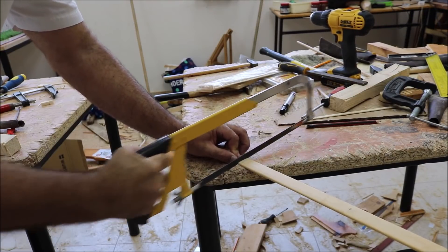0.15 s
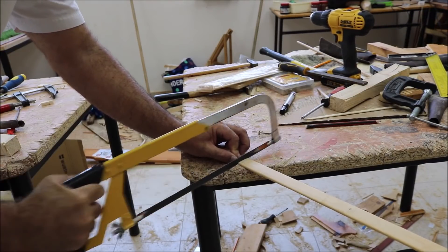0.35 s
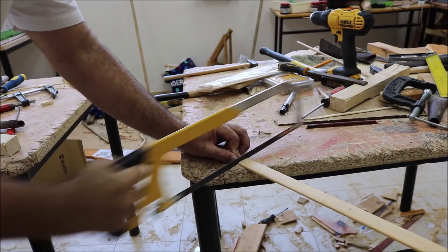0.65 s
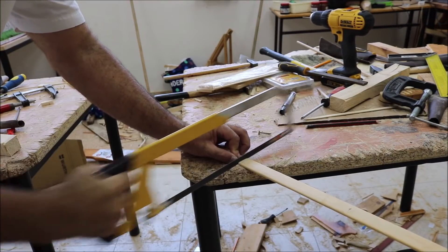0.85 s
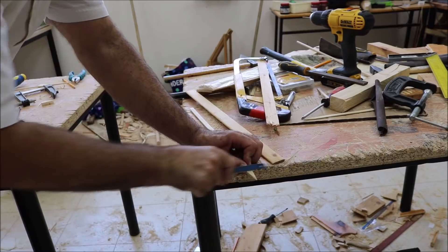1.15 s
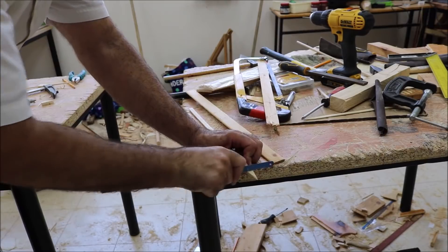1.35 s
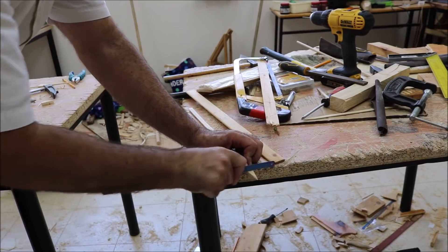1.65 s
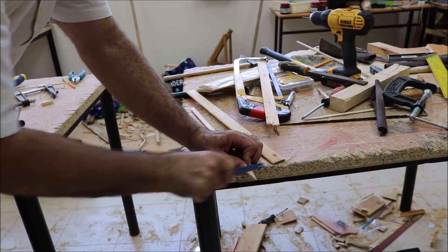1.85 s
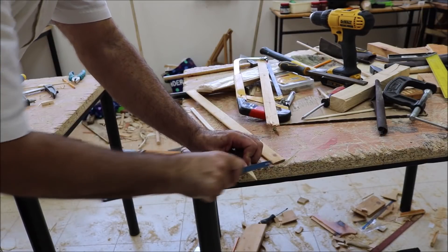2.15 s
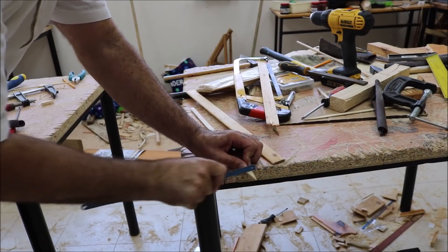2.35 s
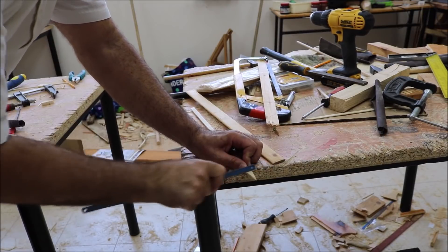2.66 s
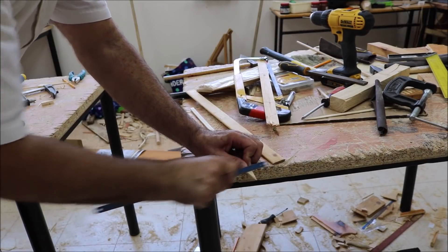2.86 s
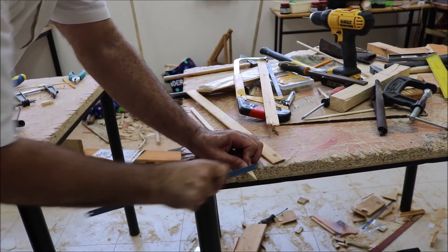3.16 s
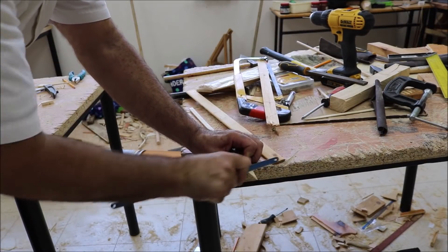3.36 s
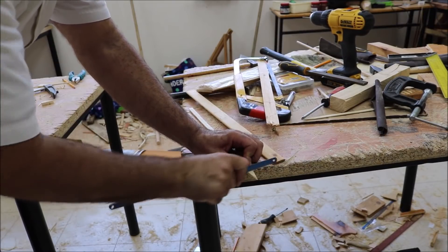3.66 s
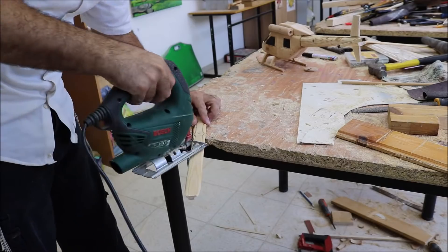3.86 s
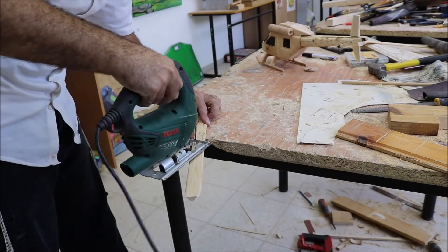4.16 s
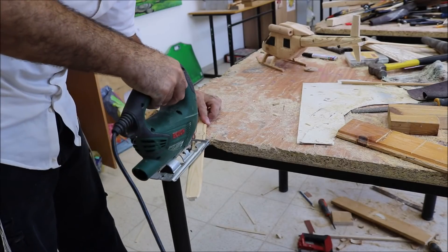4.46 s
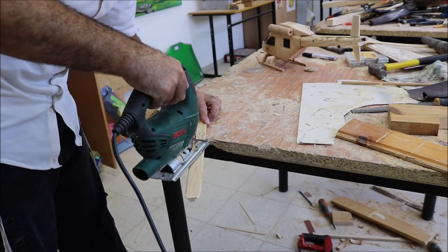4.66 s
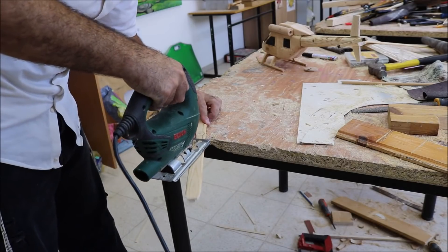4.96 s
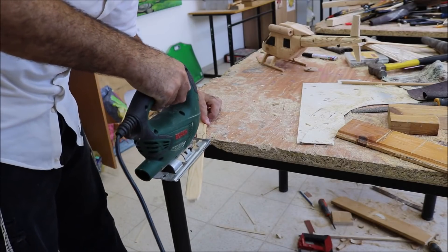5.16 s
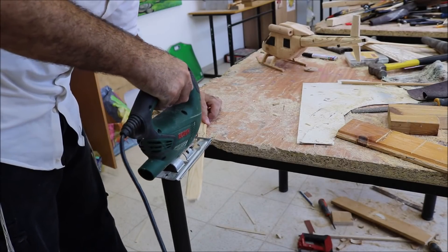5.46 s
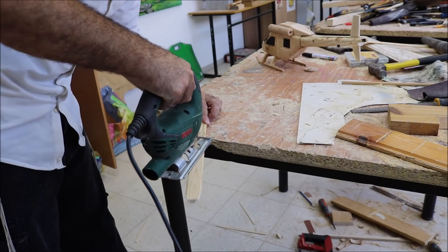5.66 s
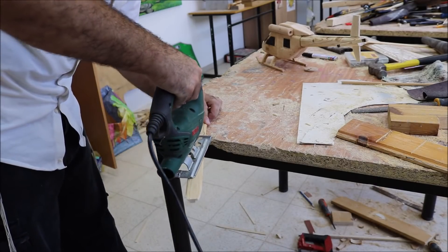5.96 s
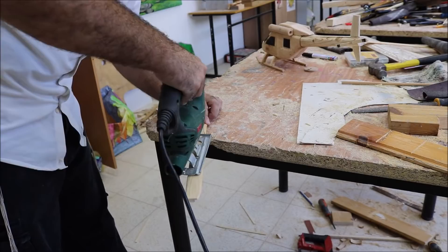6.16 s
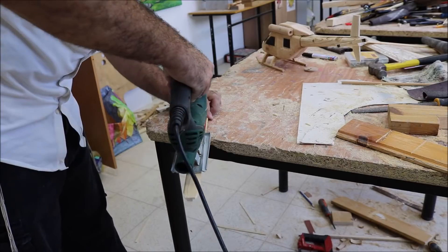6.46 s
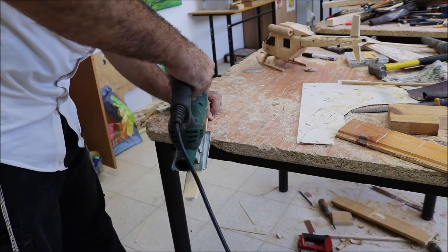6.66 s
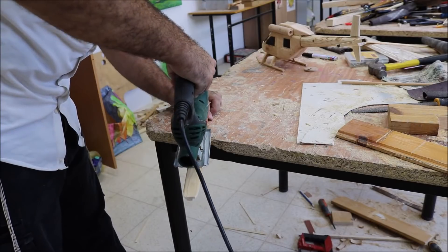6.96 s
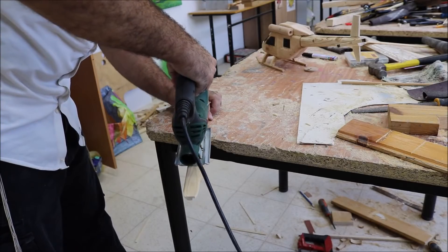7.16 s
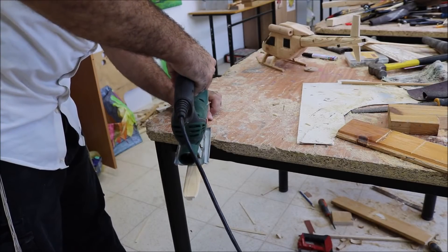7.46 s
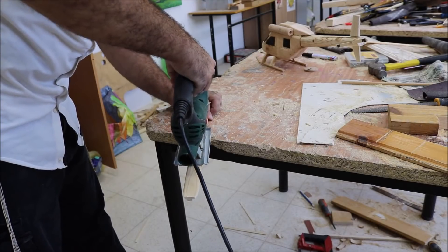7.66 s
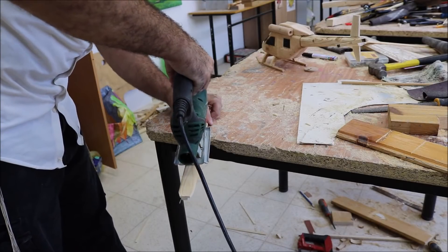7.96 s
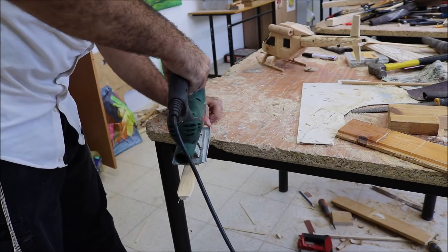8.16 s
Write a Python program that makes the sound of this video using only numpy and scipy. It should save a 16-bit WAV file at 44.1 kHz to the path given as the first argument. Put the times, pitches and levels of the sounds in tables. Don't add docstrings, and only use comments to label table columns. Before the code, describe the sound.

From 0 to 1 s a hacksaw rasps a thin slat in roughly quarter-second strokes, its teeth making a hollow woody buzz over low room rumble. After a tiny gap, at 1.05 s, a bare blade scrubs a small stick about seven strokes a second, drier and more ringing, growing brighter; sharp ticks hit the bench edge, with small squeaks around 1.7, 2.3 and 2.6 s and the loudest at 3.6 s. At 3.8 s the sound switches to a close electric jigsaw: a short blip just before 4 s, a longer pulse at 4.4 s, then a steady run from 4.7 s with whine, gear clatter and airy hiss. It labours near 5.9 s, drops out at 6.4 s amid light wooden knocks, restarts at 6.5 s with denser buzzing, and is released at 7.6 s, coasting down with a faint falling whistle and lingering hiss to about 8.4 s.

```python
import sys
import numpy as np
from scipy import signal
from scipy.fft import rfft, irfft, next_fast_len
from scipy.io import wavfile
from scipy.ndimage import uniform_filter1d, map_coordinates

SR = 44100
rng = np.random.default_rng(int(sys.argv[2]) if len(sys.argv) > 2 else 0)


def master(y):
    cut = np.clip(np.atleast_2d(y).T, -1, 1)
    pcm = np.round(cut * 32767)
    wavfile.write(sys.argv[1], SR, pcm.astype(np.int16))


def linear_from_db(decibels):
    return 10 ** (np.asarray(decibels, float) / 20)


N = 366471

T = np.arange(N) / SR
SIZE = next_fast_len(N + SR // 2)
LOG_HZ = np.log(np.arange(SIZE // 2 + 1) * SR / SIZE + 1)
GAP_S, BLADE_S, CUT_S, TRIGGER_S = 1.017, 1.049, 3.79, 3.964
FULL_HZ, START_HZ, COAST_HZ = 209.6, 135, 80
MESH_RATIO = 28 / 3

# f/Hz, level/dB per Hz
ROOM_COLOUR = [
    [(24, -43), (40, -14), (301, -9.5), (377, -4), (420, -14), (520, -6), (680, -13), (1140, -120)],
    [(18, -45), (34, -9), (50, -3), (96, -7), (124, 1.5), (167, 0.5), (268, -0.5), (329, -6), (392, -4),
     (549, -6.5), (760, -4.5), (990, -5), (1670, -120)],
    [(24, -73), (40, -39), (243, -12), (290, -9), (455, -11.5), (600, -3), (697, -10.5), (790, -2.5),
     (1550, -17), (1680, -20), (2210, -17), (2570, -21.5), (16000, -39.5)],
]
# t/s, width/s, gain/dB
SWELLS = [
    (.6, 0.047, 8),
    (1.21, 0.047, 8.5),
    (1.64, 0.14, 4.5),
]
# f/Hz, left minus right/dB
LEAN = [
    [(100, 1.5), (700, 1.5), (1300, 1), (2400, -3.5), (15000, 0)],
    [(700, 0.8), (4400, 1.2), (8100, -2)],
]
# f/Hz, likeness/0-1
FAR = [(60, 0.97), (200, 0.95), (640, 0.67), (1400, 0.26), (3000, 0.2), (15000, 0.16)]
# f/Hz, likeness/0-1
NEAR = [(300, 1), (640, 0.99), (1400, 0.99), (3100, 0.82), (6800, 0.36), (15000, 0.49)]
# start t/s, level/dB, fastest tooth rate f/Hz, place of fastest moment/0-1
SAW_STROKES = [
    (-.1, -25.5, 790, 0.39),
    (.125, -26.5, 810, .3),
    (.375, -27, 855, .7),
    (.595, -26, 835, .3),
    (.82, -27, 850, .65),
]
# f/Hz, width/Hz, level/dB
SLAT_MODES = [(600, 110, -2.5), (800, 280, 1.5), (1550, 400, 0.5), (2130, 160, -0.5), (2290, 470, -6.5),
              (3400, 970, -15)]
# f/Hz, level/dB per Hz
HACKSAW_COLOUR = [(590, -43), (1000, -17), (1160, -31), (1550, -3.5), (1870, -6.5), (2470, -6), (2740, -13),
                  (8450, -25), (16000, -41.5)]
# start t/s, level/dB, brightness/dB
BLADE_STROKES = [(.97, -36.5, -10), (1.14, -35, -10.5), (1.28, -35, -13), (1.42, -31, -12.5),
                 (1.58, -34, -12.5), (1.699, -31, -10), (1.859, -31.5, -13.5), (1.98, -31, -11.5),
                 (2.13, -34, -9), (2.25, -31, -12.5), (2.4, -33.5, -8), (2.541, -29, -12.5),
                 (2.7, -35, -7.5), (2.821, -33, -9), (2.96, -35, -6.5), (3.12, -31, -9.5), (3.27, -33, -10),
                 (3.409, -32.5, -8), (3.55, -32, -12), (3.69, -32.5, -8)]
# f/Hz, width/Hz, level/dB
STICK_MODES = [(1032, 64, -3), (1295, 54, 3), (1544, 52, 0), (1732, 25, 4.5), (1970, 55, -2.5),
               (2370, 44, 1), (2640, 77, -10), (3000, 300, -10)]
# f/Hz, level/dB per Hz
BLADE_COLOUR = [(470, -58), (800, -6.5), (1070, -1.5), (1150, -9), (1260, 1.5), (1420, -2.5), (1550, -0.5),
                (1900, -6), (2410, -2.5), (3600, -22), (8880, -21.5), (11300, -29), (16000, -38)]
# t/s, peak level/dB, f/Hz
TICKS = [(1.1438, -37, 14500), (1.4466, -39, 14600), (1.7235, -37, 15600), (2.0058, -40, 13200),
         (2.1176, -36, 10200), (2.2832, -34, 15600), (2.3984, -35, 10200), (2.5661, -33, 13200),
         (2.6713, -38, 10100), (2.8559, -33, 10000), (2.9684, -35, 14000), (3.1188, -31, 13200),
         (3.2555, -37, 10100), (3.4336, -29, 15300), (3.5433, -33, 10100), (3.7189, -31, 15500),
         (3.8761, -44, 10200)]
# t/s, peak level/dB, f/Hz
SQUEAKS = [
    (1.735, -31.5, 846),
    (1.76, -30.5, 705),
    (2.31, -35, 1287),
    (2.6, -27, 2370),
    (3.6, -25.5, 1558),
    (3.625, -22, 1518),
]
# t/s, peak level/dB, f/Hz
KNOCKS = [
    (6.244, -44, 431),
    (6.262, -42, 257),
    (6.329, -45, 423),
    (6.344, -42, 520),
    (6.376, -39.5, 415),
    (6.409, -56, 288),
    (6.468, -49, 209),
]
# t/s, length/s, first f/Hz, growth/per s, level/dB
WHISTLES = [
    (3.968, .027, 5600, 36, -34),
    (4.1, .3, 12500, -2.23, -38),
    (7.92, .3, 10450, -2.42, -38.5),
]
# on t/s, off t/s
BLIPS_S = [
    (3.966, 4.0),
    (4.4, 4.72),
]
# on t/s, off t/s
POWER_S = [
    (4.72, 6.375),
    (6.51, 7.597),
]
# t/s, gain/dB, decay/s
JOLTS = [
    (3.963, 6.5, 0.027),
    (4.404, 8.5, 0.033),
    (4.5, 3, 0.031),
    (4.646, 4.5, 0.047),
]
# t/s, width/s, speed loss/Hz, mesh gain/dB
PUSHES = [
    (5.901, .14, 4.13, 8.5),
    (6.5, .025, .1, 8),
    (6.61, 0.024, 0.52, 12),
    (6.75, .08, 2, 8),
]
# t/s, pressure/0-1
PRESSURE = [(5.0, 0.07), (5.48, 0.42), (5.7, 0.33), (5.88, 0.91), (6.08, .7), (6.38, 0.72), (6.6, 0.87),
            (6.8, 1), (7.17, 0.73)]
# t/s, level/dB
RUSH = [(3.97, -30), (4.15, -30.5), (4.39, -34.5), (4.45, -33), (4.72, -31.5), (4.8, -29.7), (5, -30),
        (6, -32), (6.2, -30), (6.46, -32.5), (6.6, -29.7), (7.5, -31), (8.05, -32.5), (8.24, -34),
        (8.29, -33.5)]
# f/Hz, level/dB per Hz
RUSH_COLOUR = [(530, -40), (900, -27), (1340, -18), (1460, -18.5), (1550, -14.5), (1920, -13), (2140, -13),
               (4010, -7.5), (6970, -3.5), (13200, -1), (16000, -6.5)]
# f/Hz, width/Hz, level/dB
CASING_MODES = [(13200, 1100, -1.5), (7800, 1200, -13)]
# multiple of half turn, first run level/dB, second run level/dB
FIELD = [(1.93, -78.5, -83.5), (4.02, -68.5, -70), (5.03, -70.5, -66.5), (5.98, -72.5, -60),
         (7.044, -61, -59), (8.03, -50.5, -57), (10.03, -63, -62), (11.05, -56, -54), (11.93, -59, -56),
         (13.1, -59, -55), (13.9, -56.5, -58), (19.94, -73, -49.5), (32.4, -65, -51), (35.8, -66, -53)]
# multiple of half turn, first run level/dB, second run level/dB
BARS = [(48, -52, -54), (50, -52, -54), (52, -49, -53), (56, -53, -43.5), (58, -47, -43.5), (60, -51, -53),
        (62, -52, -51), (64, -53, -55)]
# multiple of mesh rate, level/dB
GEAR = [(1, 1), (2, -8.5), (4, -6), (7, -9)]


def curves(table):
    s, *columns = np.transpose(table)
    return [np.interp(T, s, c) for c in columns]


def along(points):
    hz, value = np.transpose(points)
    return np.interp(LOG_HZ, np.log(hz), value)


def colour(x, points, split_hz):
    low = 1 / (1 + np.exp(6 * (LOG_HZ - np.log(split_hz))))
    shaped = rfft(x, SIZE) * linear_from_db(along(points))
    return irfft(shaped * np.array([low, 1 - low]), SIZE)[:, :N]


def unit(x, lo_hz, hi_hz):
    band = abs(rfft(x, SIZE)[int(lo_hz * SIZE / SR):int(hi_hz * SIZE / SR)]) ** 2
    return x / np.sqrt(2 * band.sum() / SIZE / N)


def ring(x, modes):
    out = 0
    for k, (hz, width_hz, db) in enumerate(modes):
        b, a = signal.iirpeak(hz, hz / max(width_hz, 5), SR)
        out = out + (-1) ** k * linear_from_db(db) * signal.lfilter(b, a, x)
    return out


def walk(rate_hz, size=N):
    levels = np.repeat(rng.standard_normal(int(9 * rate_hz) + 9), 4)
    levels = uniform_filter1d(levels, 4)
    return 1.2 * np.interp(T[:size] * rate_hz * 4, np.arange(len(levels)), levels)


def gate(t0_s, t1_s, fade_s=0.00064):
    return np.clip(np.minimum(T - t0_s, t1_s - T) / fade_s, 0, 1)


def bumps(s, width_s, size):
    return sum(g * np.exp(-((T - t) / w) ** 2) for t, w, g in zip(s, width_s, size))


def strokes(starts_s, end_s, at):
    edges = np.append(starts_s, end_s)
    place = np.interp(T, edges, np.arange(len(edges)) - 1e-9)
    k = np.clip(np.floor(place).astype(int), 0, len(starts_s) - 1)
    part = place - k
    at = np.clip(np.broadcast_to(at, len(starts_s))[k], .05, .95)
    return k, np.clip(np.minimum(part / at, (1 - part) / (1 - at)), 0, 1)


def teeth(hz, jitter, wander, scatter_db):
    uneven_hz = hz * (1 + jitter * walk(400) + wander * walk(50))
    bites = np.diff(np.floor(np.cumsum(uneven_hz) / SR), prepend=0)
    return bites * linear_from_db(scatter_db * rng.standard_normal(N))


def grit(spread_db):
    return rng.standard_normal(N) * linear_from_db(spread_db * walk(900))


def hits(table, decay_s, noisy):
    out, t = np.zeros(N + 4096), T[:4096]
    for s, db, hz in table:
        noise = np.interp(t / decay_s * 45, np.arange(256), rng.standard_normal(256))
        rough = 1 - noisy + noisy * noise
        envelope = np.exp(-t / decay_s) * np.minimum(t * hz, 1)
        out[int(s * SR):][:4096] += linear_from_db(db) * rough * np.sin(2 * np.pi * hz * t) * envelope
    return out[:N]


def space(x, likeness, lean, t60_s, wet_db):
    t = T[:SR // 2]
    decay = np.exp(-np.log(1000) * t / (t60_s * np.array([[1], [1.6]])))
    tails = rng.standard_normal((2, len(t))) * decay
    mid, side = rfft(tails / np.linalg.norm(tails, axis=1, keepdims=True), SIZE)
    like = np.clip(along(likeness), 0, .995)
    mid = (1 + linear_from_db(wet_db) * mid) / np.sqrt(1 + linear_from_db(2 * wet_db))
    side = side * np.sqrt((1 - like) / (1 + like))
    tilt = linear_from_db(along(lean) / 2)
    return irfft(rfft(x, SIZE) * np.array([(mid + side) * tilt, (mid - side) / tilt]), SIZE)[:, :N]


def room(shot):
    level_db = (-55.5, -48, -55.5)[shot] + bumps(*np.transpose(SWELLS))
    ducked_db, recover_db_s, duck_s = -77.5, 27, 0.03
    on = sum(gate(*p) for p in [*BLIPS_S, *POWER_S]) > 0
    idle_s = T - np.maximum.accumulate(np.where(on, T, -9))
    level_db = np.minimum(level_db, ducked_db + recover_db_s * idle_s)
    level_db = uniform_filter1d(level_db, int(duck_s * SR))
    rumble = sum(colour(rng.standard_normal(N), ROOM_COLOUR[shot], 300))
    return linear_from_db(level_db) * unit(rumble, 105, 380)


def hacksaw():
    starts_s, level_db, top_hz, fastest = np.transpose(SAW_STROKES)
    end_s, turn_hz = 1.03, 700
    k, effort = strokes(starts_s, end_s, at=.31)
    slack = 1 - effort
    level_db = uniform_filter1d(level_db[k], 999)
    slat_db = level_db - 0.5 - 6.5 * slack ** 2
    rasp_db = level_db - 10.5 * slack
    treble_slack = 1 - strokes(starts_s - 0.022, end_s, at=0.41)[1]
    treble_db = level_db - 9.5 - 17 * treble_slack ** 1.58

    speed = strokes(starts_s, end_s, fastest)[1]
    bites = teeth(turn_hz + (top_hz[k] - turn_hz) * speed, jitter=.078, wander=.045, scatter_db=3.5)
    slat, rasp = colour(ring(bites + 0.043 * grit(1.8), SLAT_MODES), [(500, 2.5), (1100, -8)], 1250)
    scrape, treble = colour(grit(1.3), HACKSAW_COLOUR, 3750)
    rasp = unit(rasp, 1200, 3400) + linear_from_db(-6.0) * unit(scrape, 1200, 3000)
    slat = linear_from_db(slat_db - 1.5 + 3.2 * walk(70)) * unit(slat, 550, 1000)
    rasp = linear_from_db(rasp_db - 1.0 + 2.03 * walk(45.7)) * rasp
    return slat + rasp + linear_from_db(treble_db) * unit(treble, 3700, 12000)


def blade():
    starts_s, level_db, bright_db = np.transpose(BLADE_STROKES)
    sounding_s, end_s = starts_s + 0.0076, 3.85
    k, effort = strokes(sounding_s, end_s, at=0.38)
    rasp_gain = effort * linear_from_db(level_db)[k] + (1 - effort) * linear_from_db(-43)
    bright = strokes(sounding_s, end_s, np.resize((0.35, 0.34), len(starts_s)))[1]
    bright = np.minimum(1.24 * bright, 1) ** 1.65
    turn_db = np.resize((-57, -62), len(starts_s)) + 3.4 * (starts_s - BLADE_S)
    turn_gain = np.interp(T, starts_s, linear_from_db(turn_db))
    treble_gain = bright * linear_from_db(level_db + bright_db - 1.5)[k] + (1 - bright) * turn_gain

    scrape, treble = colour(grit(1.6), BLADE_COLOUR, 2370)
    rasp = unit(ring(grit(1.6), STICK_MODES), 800, 3200) + linear_from_db(-1.0) * unit(scrape, 740, 3200)
    rasp = rasp_gain * linear_from_db(-3.5 + 1.07 * walk(40)) * rasp
    return rasp + treble_gain * linear_from_db(-0.7) * unit(treble, 5300, 9600)


def whistles():
    out = 0
    for s, length_s, first_hz, growth, db in WHISTLES:
        hz = first_hz * np.exp(growth * np.clip(T - s, 0, length_s))
        tone = np.sin(2 * np.pi * np.cumsum(hz * (1 + .011 * walk(300))) / SR)
        fall_db = 5 * np.log10(hz / first_hz) * (growth < 0)
        envelope = gate(s, s + length_s, fade_s=length_s / 6) ** .7
        out = out + linear_from_db(db + 2 * walk(80) + fall_db) * tone * envelope
    return out


def motor_speed():
    run_up_s, coast_s = .068, .185
    hz, now_hz = np.full(N, 1. * START_HZ), START_HZ
    moments = np.append(np.ravel(POWER_S), 9)
    goals = [(FULL_HZ, run_up_s), (COAST_HZ, coast_s)] * 2
    for a, b, (goal_hz, tau_s) in zip(moments, moments[1:], goals):
        glide = goal_hz + (now_hz - goal_hz) * np.exp(-np.maximum(T - a, 0) / tau_s)
        hz = np.where(T >= a, glide, hz)
        now_hz = goal_hz + (now_hz - goal_hz) * np.exp(-(b - a) / tau_s)
    return hz - bumps(*np.transpose(PUSHES)[:3])


def rush(turn):
    rise_s, jolts_db = 0.0055, 0
    for s, db, decay_s in JOLTS:
        fall = np.exp(-np.maximum(T - s - rise_s, 0) / decay_s)
        jolts_db = jolts_db + db * np.clip((T - s) / rise_s, 0, 1) * fall
    rush_db = curves(RUSH)[0] + jolts_db
    edge_db = rush_db - 12 + 4 * curves(PRESSURE)[0]

    share = .42 * sum(gate(*p, fade_s=0.098) for p in POWER_S)
    pattern = rng.standard_normal((64, 630))
    place = [T * 6, turn / (6 * np.pi) % 1 * 630]
    clatter = map_coordinates(pattern, place, order=1, mode="grid-wrap")
    throb = 1 + 0.12 * np.sin(turn) + 0.055 * np.sin(turn * 4 / 3) + .08 * np.sin(2 * turn)
    hiss = np.sqrt(1 - share) * grit(0.97) * throb + 1.28 * np.sqrt(share) * clatter
    edge, top = colour(hiss, RUSH_COLOUR, 5600)

    top = top + linear_from_db(-5) * ring(top, CASING_MODES) * gate(0, POWER_S[0][0] + .1, fade_s=.1)
    top = linear_from_db(rush_db + 0.62 * walk(30)) * unit(top, 4500, 15200)
    edge = edge - 1.24 * share * colour(edge, [(900, 0), (2000, 0)], 2030)[0]
    edge = linear_from_db(edge_db - 1.8 * share + 0.66 * walk(20)) * unit(edge, 1500, 4970)
    return (top + edge) * gate(TRIGGER_S, 9)


def drive(hz, turn):
    start = int(CUT_S * SR)
    run = (T > POWER_S[1][0]).astype(int)
    since_s = T - np.array(POWER_S)[run, 0]
    slow_db = 20 * np.log10(hz / FULL_HZ)
    on = sum(gate(*p, fade_s=.03) for p in POWER_S)
    s, width_s, _, push_db = np.transpose(PUSHES)

    hum_free_db, hum_pressed_db = -83, -51
    hum_db = hum_free_db + (hum_pressed_db - hum_free_db) * curves(PRESSURE)[0]
    hum_db = hum_db + 9 * slow_db * (1 - on / 2) - 12 * (1 - on)
    # level at start, fall in dB/s
    mesh_db = np.array((-44.5, -54))[run] - np.array((6.5, 1))[run] * since_s
    mesh_db = np.maximum(mesh_db + bumps(s, width_s, push_db) - 3.4 * (1 - on), -58)
    mesh_db = np.where(T > POWER_S[1][1], -50.5 + 1.9 * slow_db, mesh_db)
    whine_db = np.array((-40, -45))[run] - np.array((.5, 12))[run] * since_s
    whine_db = whine_db + 1.5 * walk(4.4) - 6 * (1 - on)
    first, second = (gate(*p, fade_s=0.027)[start:] for p in POWER_S)

    def line(multiple):
        waver = linear_from_db(np.minimum(2.4 * walk(4.49, size=N - start), 2.5))
        return np.sqrt(2) * waver * np.sin(multiple * turn[start:] + 6 * rng.random())

    def family(table):
        return sum((first * linear_from_db(a_db) + second * linear_from_db(b_db)) * line(k) for k, a_db, b_db in table)

    field = family(FIELD) * (hz[start:] / hz.max()) ** 14
    powered = np.pad(field + family(BARS), (start, 0))
    gear = np.pad(sum(linear_from_db(db) * line(k * MESH_RATIO) for k, db in GEAR[1:]), (start, 0))
    hum = linear_from_db(hum_db) * np.sin(3 * turn)
    mesh = linear_from_db(mesh_db) * np.sin(turn * MESH_RATIO)
    whine = linear_from_db(whine_db) * np.sin(54 * turn)
    running = gate(POWER_S[0][0], 7.86, fade_s=0.07)
    return powered + running * (np.sqrt(2) * (hum + mesh + whine) + linear_from_db(mesh_db) * gear)


def scene():
    ticks = hits(TICKS, decay_s=.005, noisy=0.92)
    squeaks = hits(SQUEAKS, decay_s=0.03, noisy=0.13)
    knocks = hits(KNOCKS, decay_s=0.0074, noisy=0.2)
    hz = motor_speed()
    turn = 2 * np.pi * np.cumsum(hz) / SR
    jigsaw = room(2) + ticks + knocks + whistles() + rush(turn) + drive(hz, turn)

    first = gate(-1, GAP_S) + linear_from_db(-59) * gate(GAP_S - .01, GAP_S + 0.011, fade_s=0.0043)
    out = space(room(0) + hacksaw(), FAR, LEAN[0], t60_s=0.14, wet_db=-10) * first
    scrub = room(1) + ticks + squeaks + blade()
    out += space(scrub, FAR, LEAN[0], t60_s=0.17, wet_db=-7.5) * gate(BLADE_S, CUT_S)
    return out + space(jigsaw, NEAR, LEAN[1], t60_s=0.46, wet_db=-7.5) * gate(CUT_S, 9)


def roll_off(x):
    return signal.sosfilt(signal.butter(12, 16800, fs=SR, output="sos"), x)


def record(dry):
    lowpass = signal.ellip(10, .2, 80, 15950, fs=SR, output="sos")
    mix = signal.sosfilt(lowpass, dry)
    return roll_off(mix)


dry = scene()
out = record(dry)
master(out)
```